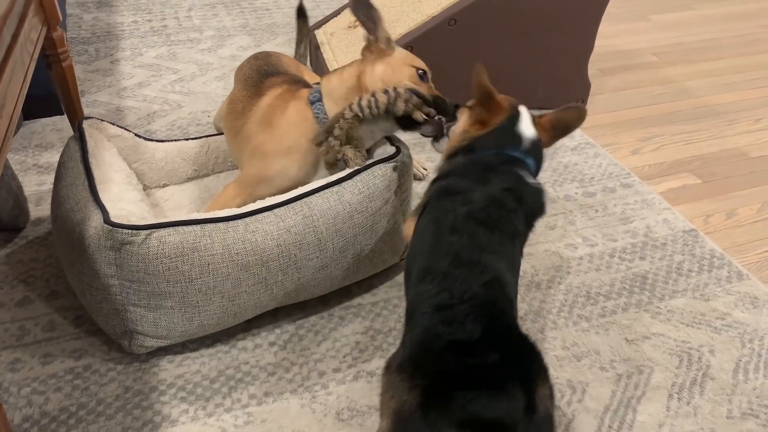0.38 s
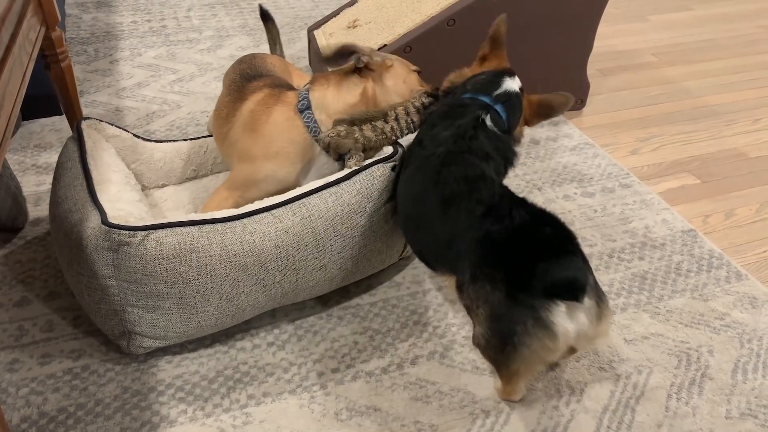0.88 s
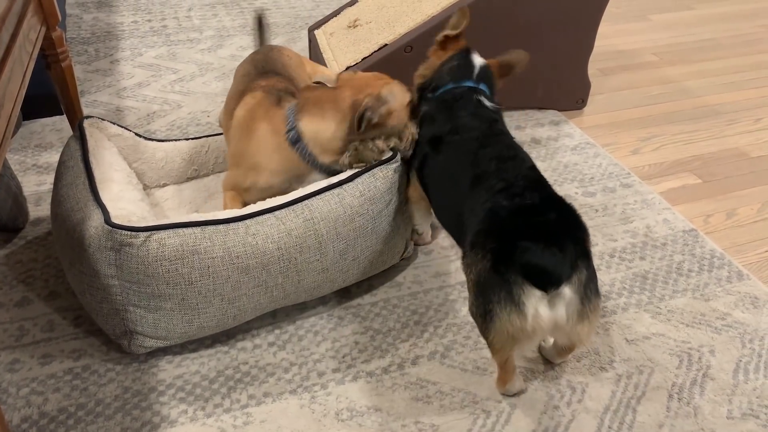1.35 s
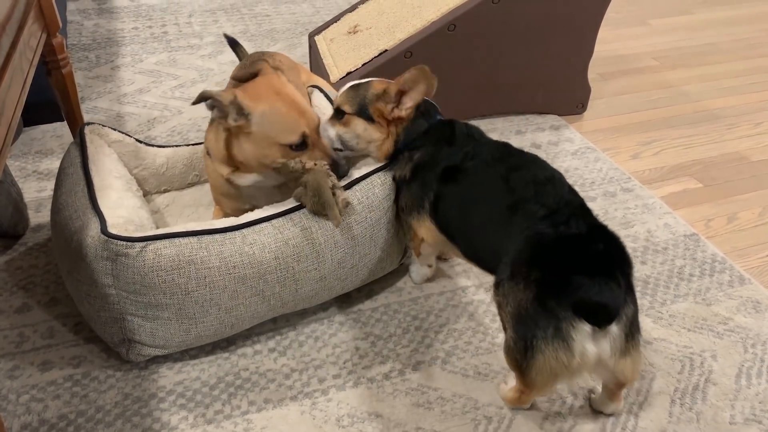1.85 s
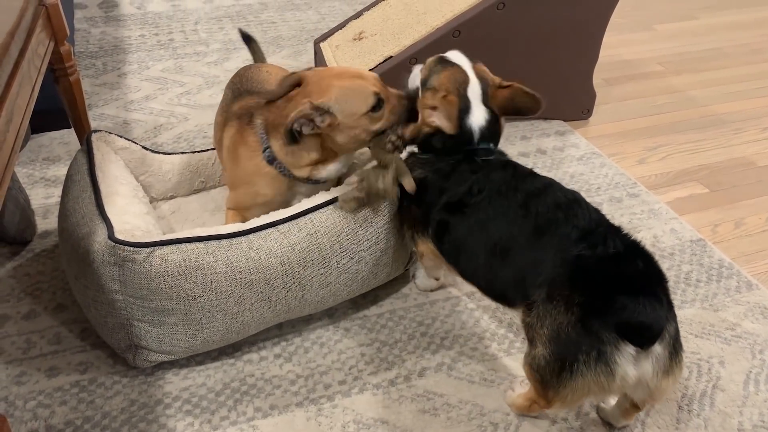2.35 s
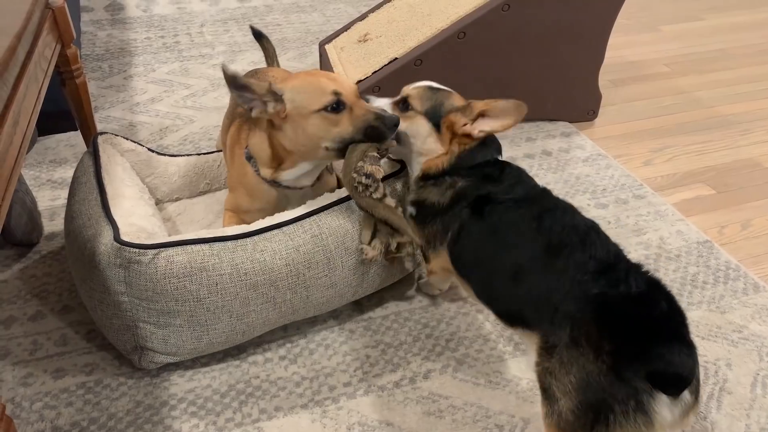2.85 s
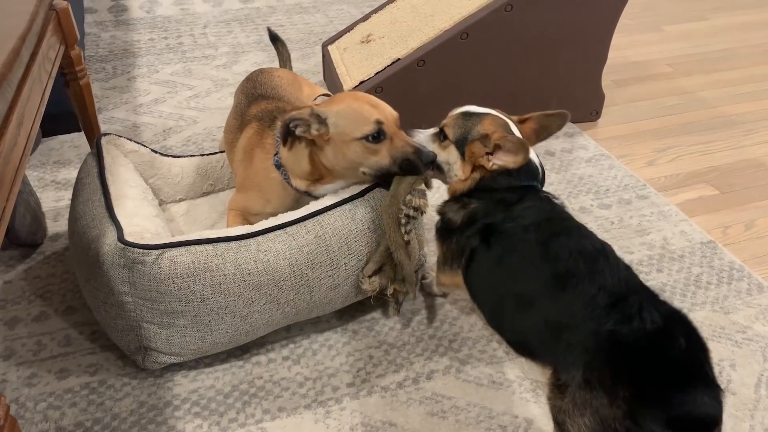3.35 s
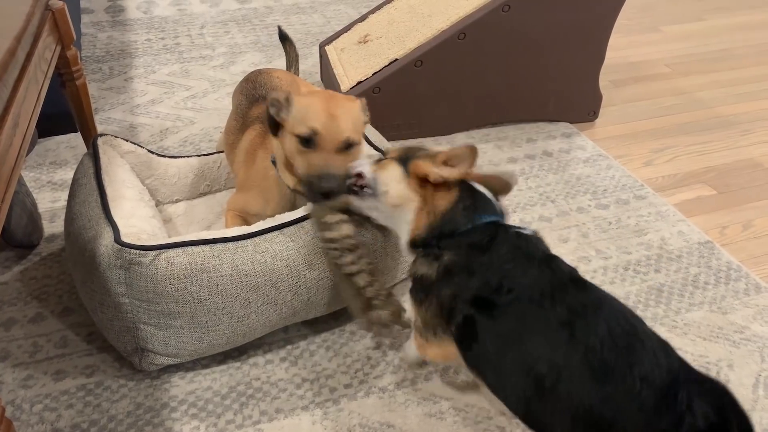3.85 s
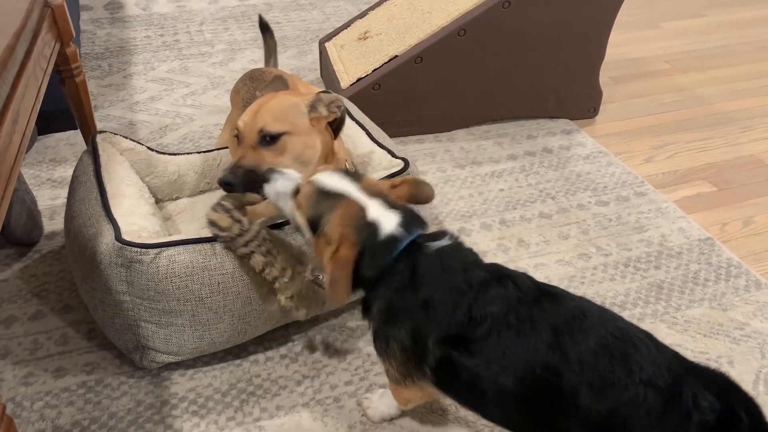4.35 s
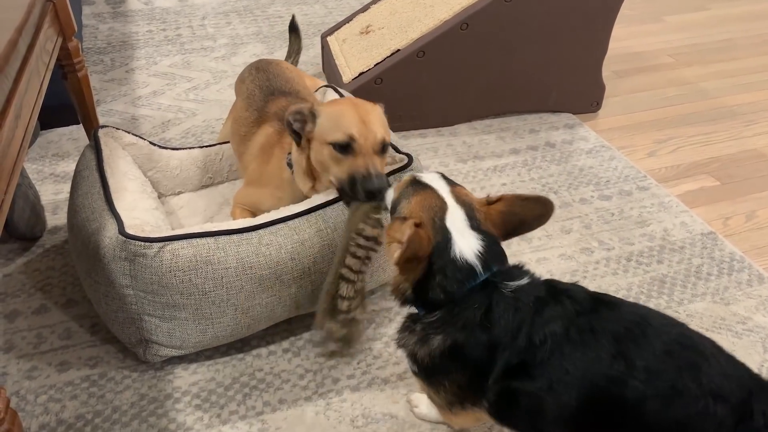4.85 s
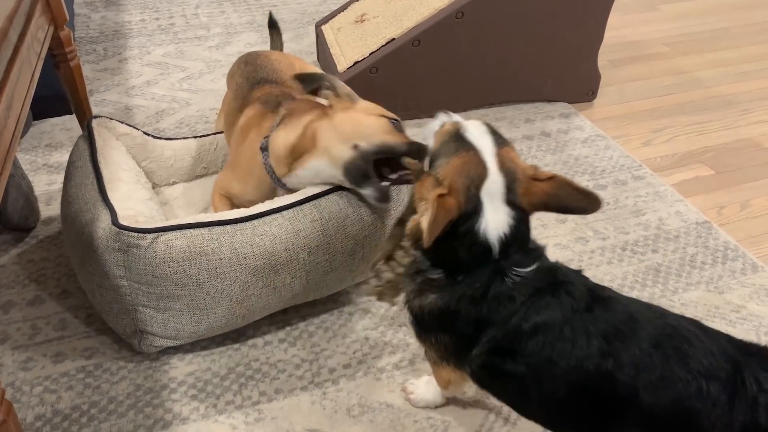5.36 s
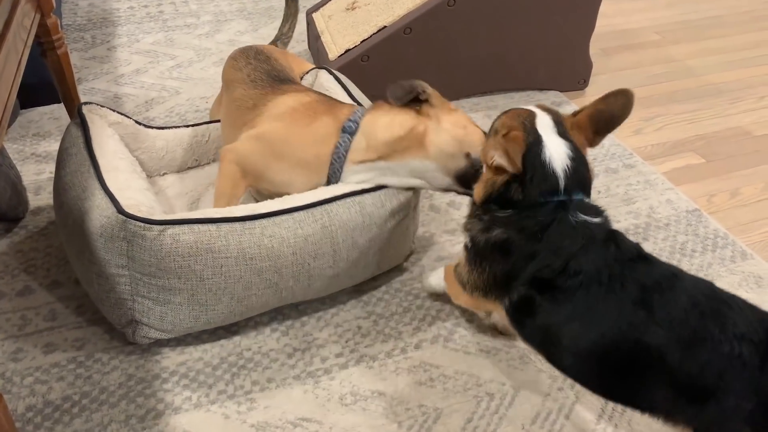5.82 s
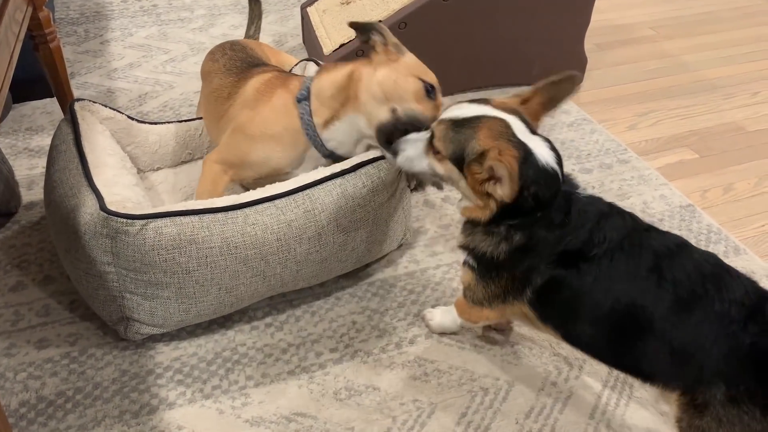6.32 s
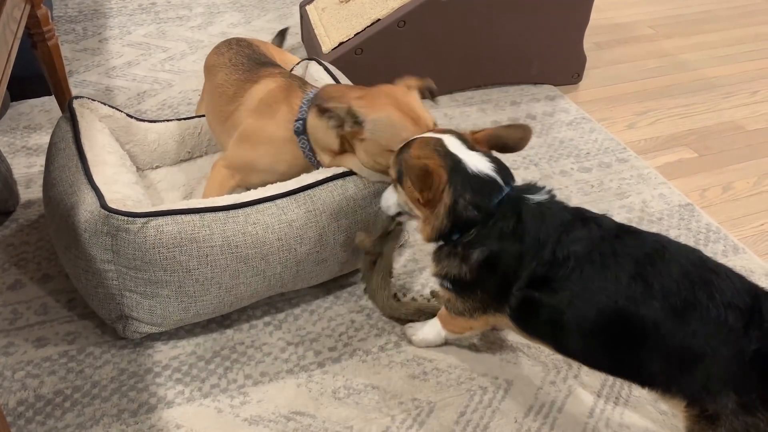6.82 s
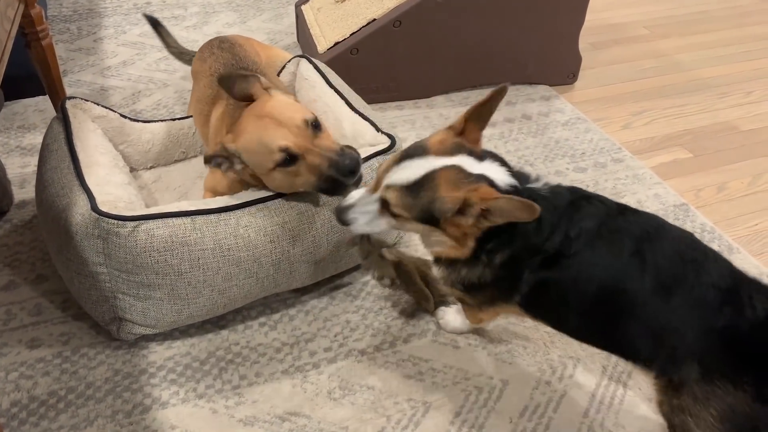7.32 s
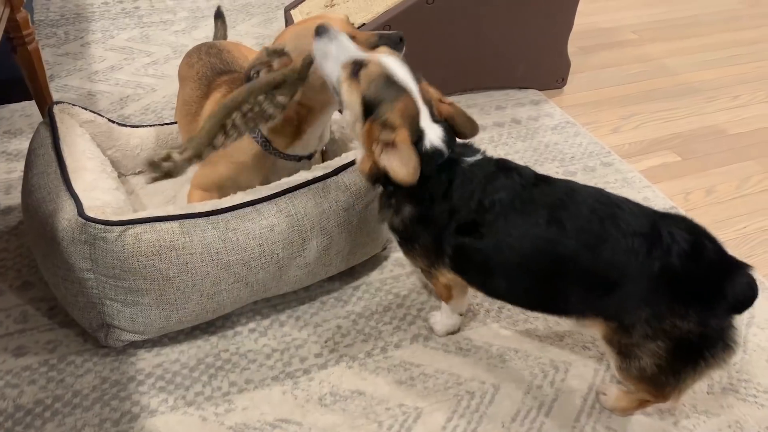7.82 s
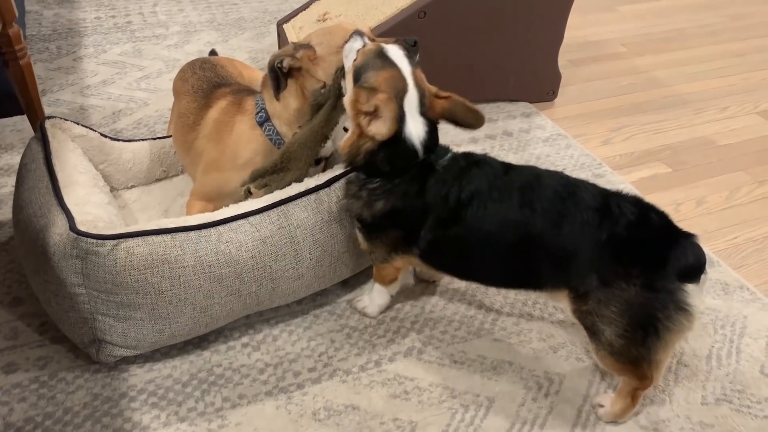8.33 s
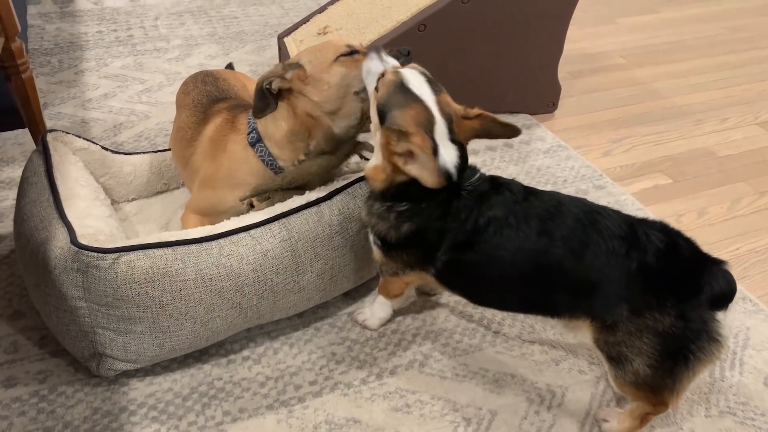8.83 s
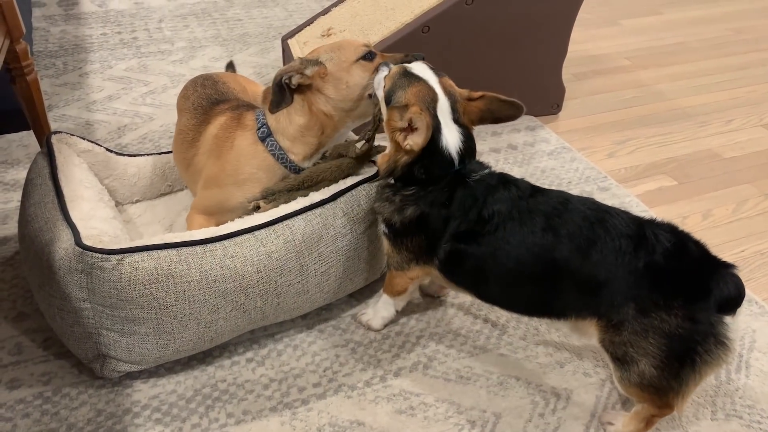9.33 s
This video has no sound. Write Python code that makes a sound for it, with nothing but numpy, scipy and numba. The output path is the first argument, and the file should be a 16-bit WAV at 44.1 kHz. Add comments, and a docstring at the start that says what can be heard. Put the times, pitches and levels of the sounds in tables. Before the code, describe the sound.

Two dogs growl in low, rough, playful bursts while tugging a plush toy, with huffing breaths, soft rustling and dull paw thuds indoors.

```python
"""Short and long growls, panting and rustling are heard as two dogs tug a plush toy on a rug in a furnished
room, a couple of metres from a hand-held phone. Rough throat pulses ring chest and mouth as growls, some
with short, dull onsets; air hisses through the muzzle; fur and cloth rustle as grainy noise. Teeth and
collar parts tick, paws thud as low rumble, and a faint background noise wavers and dips."""
import sys
import numpy as np
from scipy import signal
from scipy.fft import rfft, irfft
from scipy.io import wavfile
from scipy.ndimage import uniform_filter1d
from numba import njit

SR = 44100
rng = np.random.default_rng(int(sys.argv[2]) if len(sys.argv) > 2 else 0)


def invert_db(level):
    """Linear amplitude ratio for a level in decibels (20 dB per decade), elementwise."""
    return 10 ** (np.asarray(level, dtype=float) / 20)


def to_wav(s):
    """Save 16-bit WAV."""
    ch = np.atleast_2d(s).T  # columns
    pcm = np.round(np.clip(ch, -1, 1) * 32767)  # PCM
    wavfile.write(sys.argv[1], SR, pcm.astype(np.int16))


N = 416304  # length [samples]
T = np.arange(N) / SR  # time of each sample [s]
FREQ = np.arange(N // 2 + 1) * SR / N  # frequency of each spectrum bin [Hz]


def unit(x):
    """Scale to rms 1."""
    return x / np.sqrt(np.mean(x ** 2))


def columns(rows):
    """Each column of a table that starts with time [s], read at every sample."""
    s, *cols = np.transpose(rows)
    return [np.interp(T, s, c) for c in cols]


def over_hz(table, hz):
    """A (frequency [Hz], value) table read on a log frequency axis."""
    f, v = np.transpose(table)
    return np.interp(np.log(hz + 1), np.log(f + 1), v)


def noise(colour):
    """Noise of rms 1 whose spectrum follows a (frequency [Hz], level [dB]) table."""
    white = rfft(rng.standard_normal(N))
    return unit(irfft(white * invert_db(over_hz(colour, FREQ)), N))


def walk(rate):
    """A random line of rms 1 that heads for a new value about rate times a second."""
    k = int(SR / rate)
    steps = np.repeat(rng.standard_normal(N // k + 1), k)
    return unit(uniform_filter1d(steps, k)[:N])


@njit
def svf(x, hz, width):
    """Band-pass resonance with a moving centre, gain 1 there."""
    y, b, l = np.empty(len(x)), 0., 0.
    for i in range(len(x)):
        g, k = np.tan(np.pi * hz[i] / SR), width / hz[i]
        v = (b + g * (x[i] - l)) / (1 + g * (g + k))
        b, l, y[i] = 2 * v - b, l + 2 * g * v, k * v
    return y


def ring(x, hz, width):
    """A steep resonance of rms 1: the band-pass twice, each with this width [Hz]."""
    hz = hz + np.zeros(N)
    once = unit(svf(x, hz, 1. * width))
    return unit(svf(once, hz, 1. * width))


def band(x, lo_hz, hi_hz):
    """A steep band-pass."""
    return signal.sosfilt(signal.butter(4, [lo_hz, hi_hz], "band", fs=SR, output="sos"), x)


def swells(rows, attack_s, release_s, quiet):
    """Events rise 20 dB over the attack, hold and fall 20 dB over the release; gives level [dB],
    progress 0-1 and the further columns, in which the loudest event counts most."""
    t = T[::64]
    start, length, db, *cols = np.transpose(rows)[:, :, None]
    ramp = np.minimum((t - start) / attack_s, (start + length - t) / release_s)
    power = invert_db(2 * (db + 20 * np.clip(ramp - 1, -8, 0)))
    rest = invert_db(2 * quiet[0])
    total = power.sum(0) + rest
    progress = (power * np.clip((t - start) / length, 0, 1)).sum(0) / total
    mixed = [((power * c).sum(0) + rest * q) / total for c, q in zip(cols, quiet[1:])]
    return [np.interp(T, t, c) for c in (10 * np.log10(total), progress, *mixed)]


def during(curves, short):
    """Columns of the long curves while they last, the short events' columns elsewhere;
    the last column becomes the share of the long curves."""
    inside = sum((T > c[0][0]) & (T < c[-1][0]) for c in curves)
    inside = uniform_filter1d(1. * inside, size=500)
    long = columns(sum(curves, [])) + [1]
    return [inside * a + (1 - inside) * b for a, b in zip(long, short)]


def panting(flow):
    """The air stream hisses as it rings muzzle, palate, teeth and nose."""
    # puffs of air: (start [s], length [s], level [dB], muzzle resonance halfway [Hz],
    # palate over level [dB], teeth over level [dB], low huff over level [dB])
    puffs = [ (-.1, .2, -68, 1825, -12, -3, 2), (0.12, 0.17, -64.5, 1445, -2.5, -2, -9),
             (0.36, 0.15, -74, 1920, -12, 6.5, -22), (0.505, 0.057, -59, 1300, 3, 7, 12),
             (0.58, .17, -62, 1881, -14, -4, -14), (0.8, 0.21, -71.5, 1710, -0.5, 8.5, -5.5),
             (1.48, 0.21, -68, 1490, -15, 2, 0), (1.76, .24, -68, 1636, 7, 2, 17.5),
             (2.0, .12, -80, 1510, -6, 3, 13), (2.17, 0.091, -65.5, 1990, -11, 2, 8),
             (2.33, 0.11, -85, 1490, -7, -15, -2), (2.58, 0.14, -76.5, 1276, -29, -30, 4),
             (2.78, 0.12, -70.5, 1580, 1, 2.5, 12.5), (2.9, 0.12, -69, 1560, 9, -17, 13.5),
             (4.1, 0.085, -44, 1430, -24, -24, 0), (4.3, 0.22, -66, 1820, -5.5, -5, 4),
             (4.45, 0.14, -60.5, 1910, -12, -2.5, 1), (4.615, 0.091, -60, 1884, -9, -28, 4.5),
             (4.89, 0.063, -59.5, 1500, 1.5, 2, -11), (5.022, 0.12, -52.5, 1930, -5.5, -15, -2),
             (5.12, 0.15, -62, 1513, -11, -7.5, 0), (5.4, 0.15, -67.5, 1273, -12, -7.5, -3),
             (5.655, 0.11, -65.5, 1723, -4, 2.5, 6.5), (5.73, 0.33, -81, 1670, -3, -12, 15),
             (6.13, 0.12, -69.5, 1890, 0, -4.5, 7.5), (6.22, 0.13, -74, 1810, 2.5, -12, 3.5),
             (6.36, 0.17, -69.5, 1810, -2, -1, -0.5), (6.6, 0.11, -67.5, 1270, -13, -15, -17),
             (6.69, 0.14, -82, 1910, 11.5, 7, 13), (7.1, .1, -75.5, 1860, -9, -4, -10),
             (7.205, .1, -75, 1780, 5, 15, -3), (7.3, 0.11, -70, 1960, 4, 1, -8),
             (7.43, 0.081, -78.5, 1400, -8, -12, 21), (7.57, 0.088, -52, 1504, -15, -13.5, -11),
             (7.745, 0.096, -55, 1370, -9, -14, -7), (7.915, 0.097, -54.5, 1636, -6.5, -5.5, 0.5),
             (7.975, 0.087, -51, 1720, -14, -10, -5), (8.18, 0.13, -47, 1640, -7, -1, -7),
             (8.28, 0.24, -75, 1630, -1, -18, 6.5), (8.49, 0.15, -59, 1380, -18, -20, 5.5),
             (8.585, 0.13, -51.5, 1763, -10, -5.5, -3), (8.99, 0.28, -85, 1830, 10.5, 14.5, 14)]
    # breathing between puffs: the same columns from level on
    quiet_air = (-94.5, 1594.5, -14.5, -23, -1)
    # air in the long growls: (time [s], level [dB], muzzle resonance [Hz], palate over level [dB],
    # teeth over level [dB], low huff over level [dB], nose over level [dB])
    long_air = [
        [(0.97, -86, 1335, 7, 8.5, 8, -20), (1.01, -64, 1375, -19, -2, 3, -28),
         (1.066, -62.5, 1384, -19, -3.5, 5, -14), (1.238, -58.5, 1453, -19, -3, -5, -14.5),
         (1.268, -64, 1420, -14, 5.5, 5, -9), (1.352, -59, 1450, -25, -6.5, -7, -19),
         (1.382, -64, 1360, -14, -3, -3, -11), (1.47, -69, 1400, -7, -7, 1, -12)],
        [(3.01, -105, 1460, -6, -17, 4.7, -14), (3.022, -80, 1380, -7, -2, 4.85, -12),
         (3.036, -72, 1280, 8.5, 1, 11.5, -10), (3.068, -63, 1326, -10, -16, 4.6, -28),
         (3.094, -74.5, 1273, 0.5, -0.5, 9.4, -28), (3.306, -67.5, 1223, 1.5, -8, 13.3, -28),
         (3.332, -65.5, 1280, 1, -37, 10.5, -56), (3.38, -70, 1253, 1, -14.5, 7, -43)],
        [(3.4, -57.5, 1500, 2, -8, 4, -41), (3.462, -58, 1384, -3, -6.5, 12, -15.5),
         (3.616, -47, 1450, -8, -10.5, 3.5, -28), (3.724, -51.5, 2020, -17, -10, -4, -39),
         (3.814, -56.5, 1740, -6, -7, 4, -30), (3.916, -63.5, 1473, -9, -9, 11, -13),
         (3.98, -64, 1866, -5, -3, 1, -19), (4.07, -66, 1860, -2, -9, 0, -28)],
    ]
    # further resonances of the snout: (centre [Hz], width of each pass [Hz], level [dB])
    snout = [(1400, 250, -10), (1800, 800, -4)]
    # further resonance at the teeth: (centre [Hz], width of each pass [Hz], level [dB])
    teeth_extra = [(3720, 630, -5.5)]
    # resonance at the teeth as the jaws shift on the toy: (time [s], centre [Hz])
    teeth_path = [(0.0, 2880), (0.1, 3780), (0.21, 2710), (0.45, 3870), (0.5, 2960), (1.57, 3474),
                  (2.18, 2860), (2.42, 3450), (3.89, 3140), (4.31, 3940), (4.44, 3100), (4.55, 3930),
                  (4.7, 3060), (5.39, 3480), (7.13, 3090), (7.26, 3890), (7.31, 3360), (7.7, 3070),
                  (9.15, 3440), (9.44, 3760)]
    nose_over_level_db = -30  # in the short puffs
    muzzle_opens = 0.076  # share by which the muzzle resonance rises during a puff
    wander = 0.038  # typical share by which muzzle and palate resonances stray at random

    db, progress, hz, *colour = swells(puffs, attack_s=0.023, release_s=0.08, quiet=quiet_air)
    opening_hz = hz * (1 + muzzle_opens * (progress - .5))
    short = (db, opening_hz, *colour, nose_over_level_db, 0)
    air_db, muzzle_hz, palate_db, teeth_db, huff_db, nose_db, long = during(long_air, short)

    flow = flow * invert_db(3.5 * walk(35))  # the air flutters
    soft, sharp = band(flow, 1150, 2300), band(flow, 2600, 4900)
    muzzle = ring(soft, muzzle_hz * (1 + wander * (1 - long) * walk(25)), 230)
    for centre, width, level in snout:
        muzzle = muzzle + invert_db(level) * ring(soft, centre, width)
    palate = ring(band(flow, 2000, 3130), 2365 * (1 + wander * walk(18)), 550)
    teeth = ring(sharp, columns(teeth_path)[0], 530)
    for centre, width, level in teeth_extra:
        teeth = teeth + invert_db(level) * ring(sharp, centre, width)
    nose = ring(band(flow, 5000, 6800), 5820, 980)
    huff = ring(band(flow, 390, 1335), 770, 1200)
    upper = invert_db(palate_db) * palate + invert_db(teeth_db) * unit(teeth) + invert_db(nose_db) * nose
    return invert_db(air_db) * (unit(muzzle) + upper + invert_db(huff_db) * huff)


def rustle():
    """Fibres of fur and cloth slip in dense, uneven grains."""
    # fur and cloth rubbing: (start [s], length [s], level [dB])
    rubs = [(-.05, .3, -60.5), (0.28, 0.058, -74), (0.43, 0.24, -65.5), (1.46, 0.21, -63),
            (1.64, 0.27, -64), (1.87, 0.21, -69), (2.74, 0.26, -72), (3.4, 0.58, -71), (3.88, 0.35, -69.5),
            (4.22, 0.18, -65.5), (4.78, 0.16, -78), (5.52, 0.3, -86), (5.63, 0.31, -71.5),
            (6.07, 0.23, -71.5), (6.6, 0.66, -83.5), (7.2, 0.6, -83), (7.97, 0.15, -68),
            (8.17, 0.16, -65.5)]
    # colour of the rubbing: (frequency [Hz], level per Hz [dB])
    rub_colour = [(1760, -20), (3000, -6.5), (4370, -15.5), (6730, -7), (8350, -13), (10800, -21),
                  (11500, -41.5), (12200, -15.5), (14300, -21), (15800, -22)]
    db = swells(rubs, attack_s=0.045, release_s=0.13, quiet=[-90])[0]
    grains_db = 1.2 * walk(25) + 2.3 * walk(260)
    return invert_db(db + grains_db) * noise(rub_colour)


def thumps():
    """Weight shifting on the floor, felt as uneven low rumble."""
    # paws and bodies shifting on the floor: (start [s], length [s], level [dB])
    shifts = [(0.0, 0.36, -55.5), (0.24, 0.1, -49), (0.69, 0.29, -61.5), (1.38, .22, -55),
              (2.05, 0.23, -63), (2.4, 0.12, -71), (2.51, 0.25, -52), (2.78, 0.32, -55.5), (3.37, .4, -50),
              (3.8, 0.32, -45), (4.2, 0.4, -66), (4.5, .5, -73), (5.42, 0.45, -62.5), (6.1, .3, -68),
              (6.54, .55, -66), (7.27, .25, -60), (7.55, 0.48, -61.5), (8.45, 0.29, -58), (8.95, 0.17, -68),
              (9.12, 0.33, -67)]
    db = swells(shifts, attack_s=.06, release_s=0.18, quiet=[-83])[0]
    rumble = ring(rng.standard_normal(N), 60, 74)
    return invert_db(db + 3.9 * walk(6.9)) * rumble


def background():
    """Faint background noise that wavers and dips, most alike left and right in the bass."""
    # colour of the noise: (frequency [Hz], level per Hz [dB])
    background_colour = [(15, -48), (25, -14.5), (80, 5.5), (262, -8), (514, -9.5), (882, -13), (1600, -19),
                         (2330, -17.5), (2670, -24), (6860, -42), (9480, -31.5), (11500, -44),
                         (15800, -66.5)]
    # level of the noise, before a slow random waver: (time [s], level [dB])
    background_level = [(0, -66), (2.5, -70.5), (4.5, -66.5), (5.15, -67.5), (5.35, -71), (5.5, -66.5),
                        (8.6, -72.5), (8.9, -76.5), (9.0, -70), (9.44, -75)]
    side = irfft(rfft(noise(background_colour)) * np.clip(FREQ / 1500, .2, 1), N)
    waver_db = 2 * walk(3)
    both = noise(background_colour) + side * np.array([[1], [-1]])
    return invert_db(columns(background_level)[0] + waver_db) * both


@njit
def folds(hz, rough, chance, jitter, shimmer, halving):
    """One closure a cycle; lengths and sizes scatter, and strong and weak cycles alternate."""
    pulses, phase, p, k, stretch = np.zeros(len(hz)), np.empty(len(hz)), 0., 0, 1.
    for i in range(len(hz)):
        p += hz[i] * stretch / SR
        if p >= 1:
            p, k = p - 1, k + 1
            turn = 2 * (k % 2) - 1
            stretch = np.exp(jitter * rough[i] * chance[k, 0])
            pulses[i] = np.exp(shimmer * rough[i] * chance[k, 1] + halving * turn)
        phase[i] = p
    return pulses, phase


def growls():
    """Pulses of the vocal folds ring chest, throat and mouth; also gives the air stream that they chop."""
    # short growls: (start [s], length [s], chest level [dB], rattle rate at the start [Hz],
    # throat over chest [dB], mouth over chest halfway [dB], mouth resonance [Hz])
    short_growls = [ (0.08, 0.18, -48, 63.16, 3, -11, 735), (0.525, .19, -45, 61, 2, -20, 936.5),
                    (1.64, 0.048, -45, 65, 4.5, -9, 885.2), (1.745, 0.24, -39, 74.4, -1.5, -16, 925.6),
                    (2.075, .14, -43.5, 63.45, -17, -11.5, 834), (2.33, 0.089, -44, 68.67, -19, -19.5, 650),
                    (2.54, 0.1, -43.5, 66.9, -34, -12, 820), (2.75, 0.15, -44, 75.07, -4, -22, 698),
                    (4.07, .12, -36.5, 65.95, -1.5, -20, 776), (4.32, 0.075, -41.5, 60, -2, -17.5, 724),
                    (4.474, 0.18, -39, 73.6, -6, -9.5, 773), (4.775, 0.13, -39, 77.57, -7, -14.5, 800),
                    (5.462, 0.056, -47.5, 61.83, -1.5, -16.5, 753),
                    (5.74, 0.24, -39.5, 68.18, -12, -18.5, 877), (6.09, .15, -40, 56.9, -2, -18.5, 780),
                    (6.622, 0.065, -47.5, 67.54, -11.5, -21, 1150), (6.785, .18, -39, 67.9, -1.5, -20, 797),
                    (7.075, 0.11, -41.5, 63, -5, -21, 804), (7.292, 0.093, -43, 63.1, -6.5, -16, 793),
                    (7.545, 0.085, -41.5, 57.5, -8.5, -16.5, 736),
                    (7.728, .08, -42, 58.05, -13, -13.5, 733.7),
                    (7.912, 0.099, -41, 65.34, -6, -12.5, 640.3),
                    (8.137, 0.097, -44.5, 68.45, -9.5, -7.5, 720.1),
                    (8.484, .145, -44.5, 61, -12.5, -21, 724)]
    # long growls: (time [s], chest level [dB], throat over chest [dB], mouth over chest [dB],
    # mouth resonance [Hz])
    long_growls = [
        [(0.96, -63.5, -10, -31, 660), (0.99, -36.5, -6, -22.5, 645), (1.104, -35, -1.5, -30, 693),
         (1.23, -44.5, 5.5, -18.5, 657), (1.274, -36, 1.5, -25, 766), (1.334, -32.5, -12, -38, 647),
         (1.362, -39, -3, -31, 703), (1.392, -36, -10.5, -35, 700), (1.494, -47.5, 6.5, -9, 780),
         (1.524, -37, 1.5, -28, 807), (1.63, -61, -2, -27, 800)],
        [(3.01, -80, -5, -8, 932), (3.03, -50.5, -14, -8, 929), (3.058, -39, -20, -10, 922),
         (3.126, -45, -19.5, -7.5, 958), (3.2, -37.5, -2.5, -9, 905), (3.226, -44.5, -2, -6.5, 1030),
         (3.298, -37, -7, -17, 920), (3.326, -34.5, -13, -10, 1010), (3.35, -40.5, -14, -20, 965),
         (3.39, -48.5, 4, 0, 969), (3.41, -50.5, 2, 1, 1000)],
        [(3.42, -49.5, 1, 2, 866), (3.476, -38.5, -36, -2, 864), (3.576, -36.5, -7.5, -1, 829),
         (3.634, -39, 1.5, 0.5, 991), (3.662, -34, -19, -5, 803), (3.82, -42.5, -30, -8, 846),
         (3.894, -33.5, 3, -17, 980), (3.92, -34, -10, -23, 870), (3.95, -44, 6, -13, 796),
         (4.01, -50, -11, -11, 902), (4.07, -73, -11, -17, 805)],
    ]
    rattle_sag = .08  # share by which the rattle slows from start to end of a short growl
    mouth_closes_db = 5  # the mouth fades by this much from start to end of a short growl
    long_rattle_hz = 61  # average rate in the long growls
    short_rough, long_rough = .38, .5  # how uneven the cycles are, 0 steady - 1 chaotic

    db, progress, hz, throat_db, mouth_db, mouth_hz = swells(
        short_growls, attack_s=.022, release_s=.045, quiet=(-120, 62, -12, -11.5, 799.5))
    short = (db, throat_db, mouth_db - mouth_closes_db * (progress - .5), mouth_hz, 0)
    chest_db, throat_db, mouth_db, mouth_hz, long = during(long_growls, short)
    short_hz = hz * (1 - rattle_sag * progress)
    hz = (1 - long) * short_hz + long * long_rattle_hz * (1 + .04 * walk(8))
    rough = short_rough + (long_rough - short_rough) * long
    voiced = np.clip((chest_db + 80) / 10, 0, 1)  # 0 when silent, 1 in a growl

    # the folds close twice in each rattle cycle, once hard and once softly
    chance = rng.standard_normal((N // 100, 2))
    pulses, phase = folds(2 * hz, rough, chance, jitter=.27, shimmer=.55, halving=.5)
    puff = np.exp(-phase / 0.8)
    pulses = pulses - uniform_filter1d(pulses, size=2000)

    # the closed muzzle traps the band near 400 Hz, between these two filters
    low_pass_band = signal.cheby2(4, 20, [45, 360], "band", fs=SR, output="sos")
    below = signal.sosfilt(low_pass_band, pulses)
    chest = ring(below, 112.3, 84.6)
    throat = ring(below, 172, 92.4) + invert_db(-10) * ring(below, 253, 140)
    # turbulence at the folds blurs the mouth resonances
    raspy = unit(pulses) + rough * unit(puff * rng.standard_normal(N))
    mouth_pass_band = signal.cheby2(3, 18, [380, 1600], "band", fs=SR, output="sos")
    raspy = signal.sosfilt(mouth_pass_band, raspy)
    mouth = ring(raspy, mouth_hz, 260)
    mouth = mouth + invert_db(-5.5) * ring(raspy, 667, 280) + invert_db(-29) * ring(raspy, 982, 340)
    voice = chest + invert_db(throat_db) * unit(throat) + invert_db(mouth_db) * unit(mouth)

    # in a growl the air leaves in puffs, each opened by the snap of a closure
    chopped = (1 + .8 * voiced * (unit(puff) - 1)) * rng.standard_normal(N)
    flow = chopped + .6 * voiced * unit(pulses)
    return voiced * invert_db(chest_db) * voice, flow


def hits(table, broad):
    """A short noise burst that rings near its centre and splashes around it."""
    out, t = np.zeros(N), np.arange(3000) / SR
    for s, db, hz, t60 in table:
        burst = rng.standard_normal(len(t)) * np.exp(-np.log(1000) * t / t60)
        centre = hz + 0 * t
        sound = svf(burst, centre, 0.18 * hz) + broad * svf(burst, centre, 0.57 * hz)
        i = int(s * SR)
        out[i:i + len(t)] += invert_db(db) * sound / np.abs(sound).max()
    return out


def ticks():
    """Teeth, claws and collar parts: bright contacts with much splash."""
    # (time [s], peak level [dB], centre [Hz], time for the burst to fade by 60 dB [s])
    tick_list = [(0.3247, -38, 8800, 0.0032), (0.505, -80, 5920, 0.0077), (2.5777, -57.5, 7950, 0.01),
                 (2.68, -56.5, 8350, 0.0031), (2.7902, -52, 4370, 0.027), (3.022, -48.5, 5750, 0.013),
                 (4.15, -35, 4900, 0.0056), (4.241, -32.5, 8898, 0.011), (5.5384, -51, 5785, 0.011),
                 (6.55, -47.5, 4004, 0.0067), (7.223, -61, 4367, 0.033), (7.7348, -54.5, 10310, 0.011), ]
    return hits(tick_list, broad=0.78)


def dull_onsets():
    """Short, dull onsets of growls and puffs, with little splash."""
    # (time [s], peak level [dB], centre [Hz], time for the burst to fade by 60 dB [s])
    onset_list = [(0.865, -55.5, 1145, 0.027), (1.657, -47.5, 870, 0.016), (2.46, -64, 663.4, 0.03),
                  (2.914, -41.5, 899, 0.017), (4.464, -49.5, 850, 0.03), (4.637, -56, 1857, 0.03),
                  (4.909, -51, 587, 0.025), (5.043, -60, 1865, 0.03), (5.662, -45, 995.5, 0.024),
                  (6.368, -49, 900, 0.085), (6.616, -50, 1130, 0.035)]
    return hits(onset_list, broad=0.12)


def room(x):
    """Decaying scatter from the walls, most alike at both ports in the bass."""
    # how long the room rings: (frequency [Hz], time to fade by 60 dB [s])
    room_t60 = [(60, 0.45), (250, 0.24), (1000, 0.32), (4000, 0.34), (12000, 0.023)]
    t, out = np.arange(SR // 2) / SR, 0
    left_right = np.array([[1], [-1]])
    for hz in 60 * 2 ** np.arange(8.):
        mid, side = (svf(rng.standard_normal(len(t)), hz + 0 * t, 0.62 * hz) / np.sqrt(hz) for _ in range(2))
        decay = np.exp(-np.log(1000) * t / over_hz(room_t60, hz))
        fade = decay * (t > .004) * np.sqrt(hz)  # the walls answer after 4 ms
        out = out + fade * (mid + np.clip(hz / 2000, .3, .9) * side * left_right)
    out = out / np.sqrt(np.sum(out ** 2) / 2)
    return signal.fftconvolve(x[None], out, axes=1)[:, :N]


def two_ports(heard):
    """The phone's two sound openings differ in phase and level, split evenly between left and right."""
    # phase by which the left port leads: (frequency [Hz], lead [radians])
    port_phase = [(0, 0), (1460, 0.1), (2840, 1.3), (3700, 3.4), (4820, 1.4), (6290, -3.0), (7490, -3.7),
                  (9040, -6.2), (9650, -6.4), (11100, -9.2), (12300, -9.6), (13200, -12.5), (14400, -12.5),
                  (15600, -14.9)]
    # level of the left port over the right: (frequency [Hz], difference [dB])
    port_level = [(60, -1.5), (110, -2.5), (200, -3.0), (380, -1.0), (700, -1.0), (1290, -1.0),
                  (2380, -1.0), (4400, -1.0), (8120, 0.0), (15000, 0.0)]
    f, lead = np.transpose(port_phase)
    port = np.exp(.5j * np.interp(FREQ, f, lead)) * invert_db(over_hz(port_level, FREQ) / 2)
    return irfft(rfft(heard) * np.array([port, 1 / port]), N)


def scene():
    """The dogs reach two ports a few centimetres apart, directly and by the walls; background is added."""
    voice, flow = growls()
    dogs = voice + panting(flow) + rustle() + ticks() + dull_onsets() + thumps()
    heard = invert_db(-3.0) * dogs + invert_db(-10.5) * room(dogs)  # direct sound and walls
    return two_ports(heard) + background()


def low_pass(x):
    """Removes everything above the highest recorded frequency."""
    return signal.sosfilt(signal.butter(12, 15990, fs=SR, output="sos"), x)


def record(dry):
    """The finished mix as the phone keeps it."""
    return low_pass(dry)


dry = scene()
out = record(dry)
to_wav(out)
```